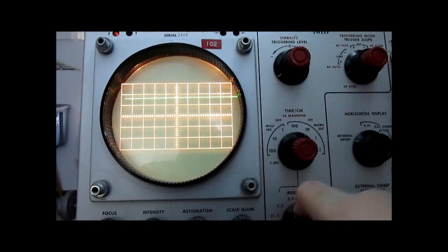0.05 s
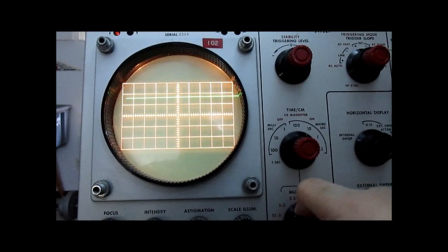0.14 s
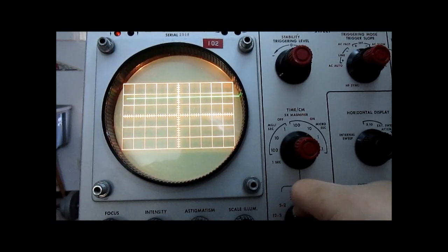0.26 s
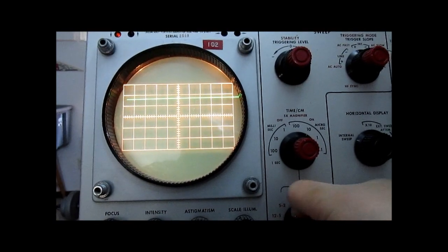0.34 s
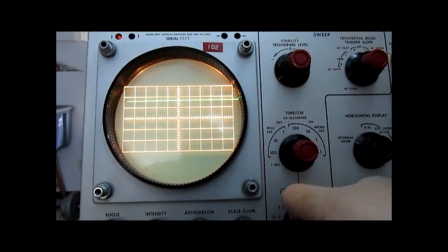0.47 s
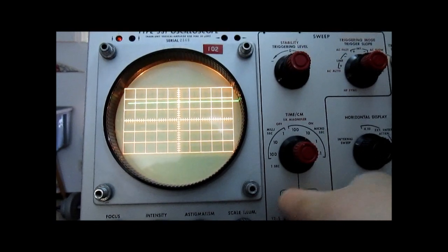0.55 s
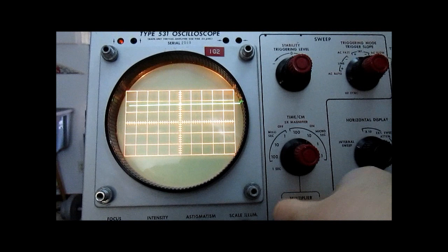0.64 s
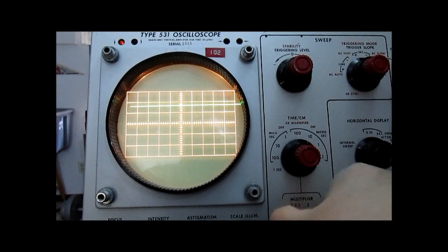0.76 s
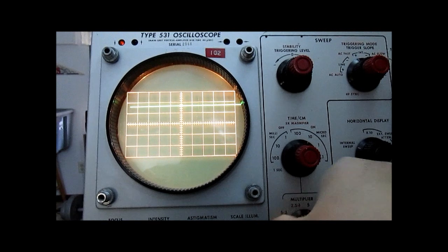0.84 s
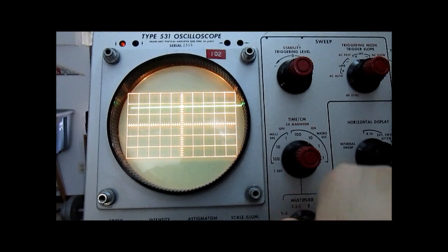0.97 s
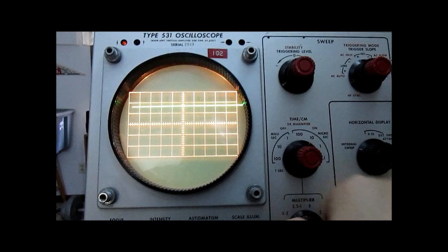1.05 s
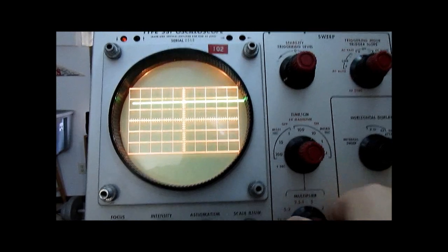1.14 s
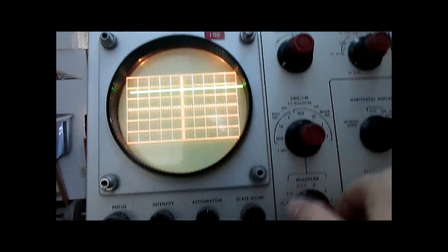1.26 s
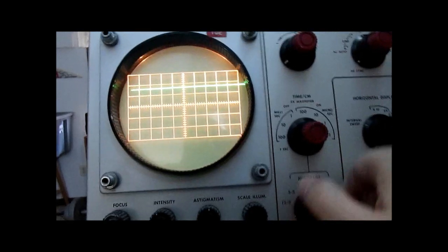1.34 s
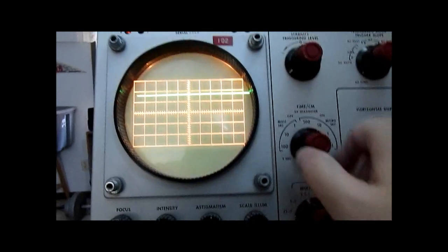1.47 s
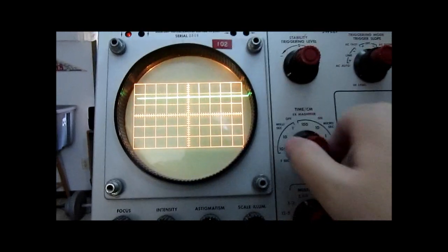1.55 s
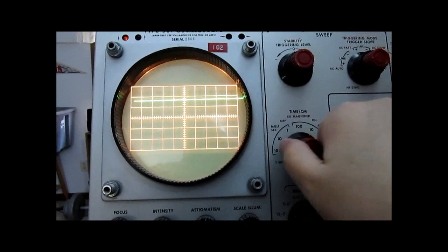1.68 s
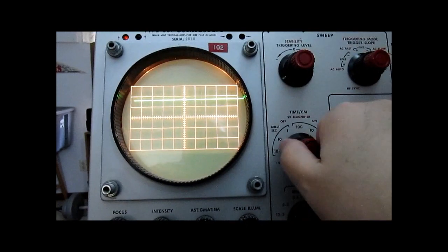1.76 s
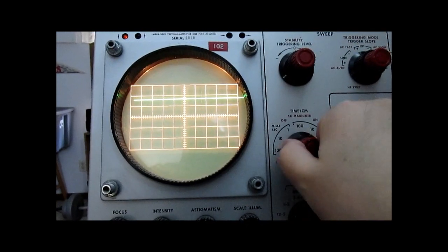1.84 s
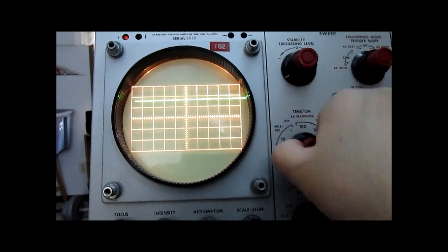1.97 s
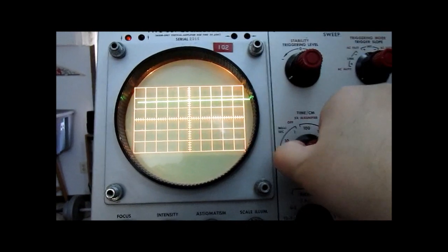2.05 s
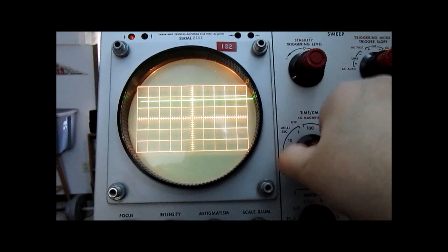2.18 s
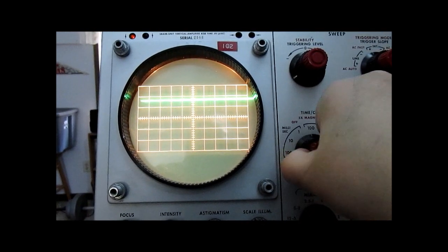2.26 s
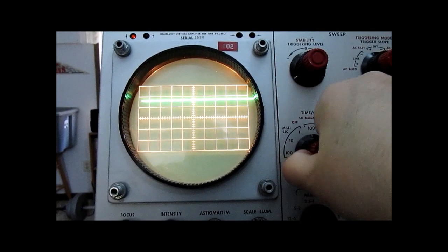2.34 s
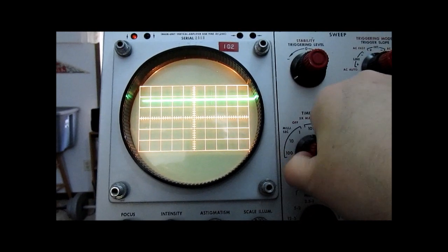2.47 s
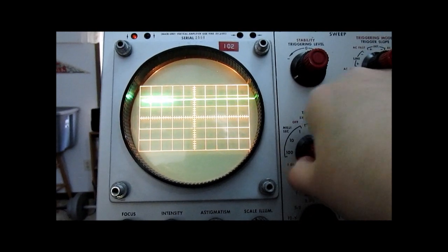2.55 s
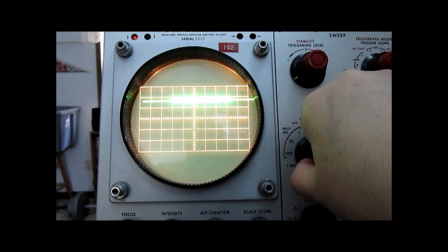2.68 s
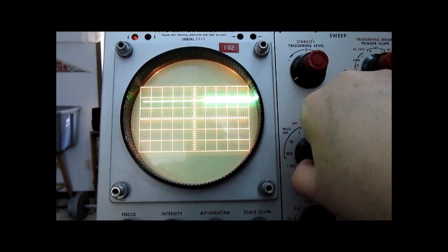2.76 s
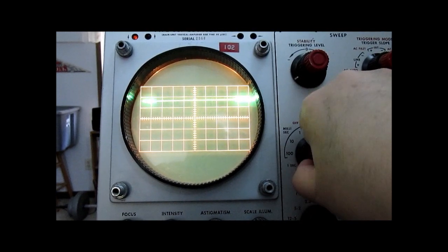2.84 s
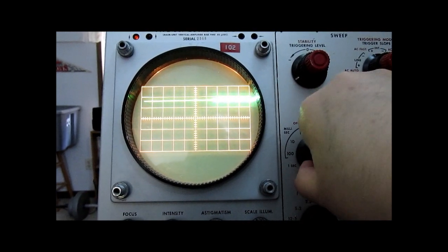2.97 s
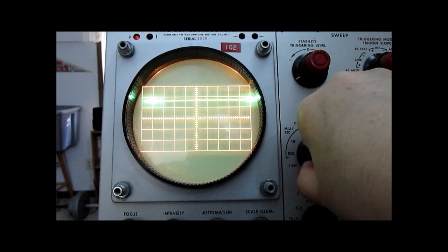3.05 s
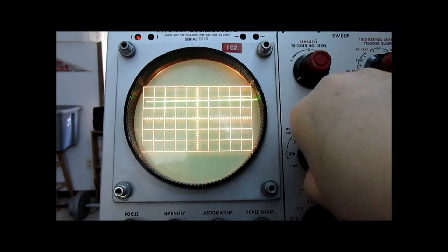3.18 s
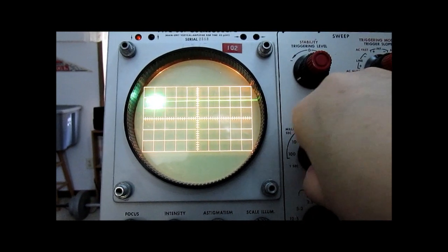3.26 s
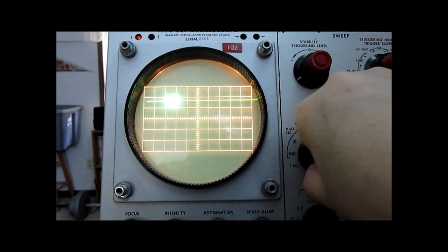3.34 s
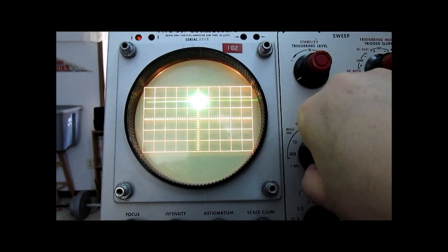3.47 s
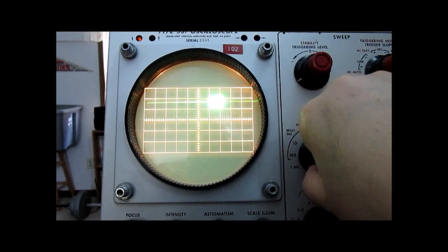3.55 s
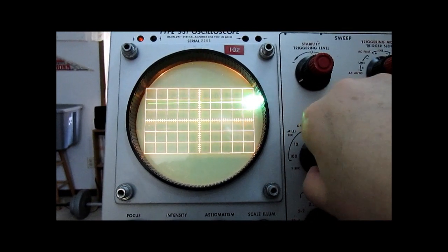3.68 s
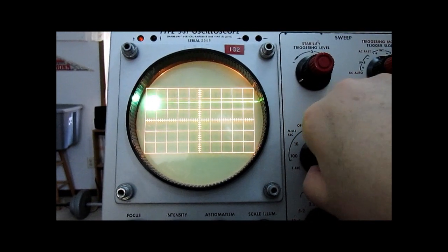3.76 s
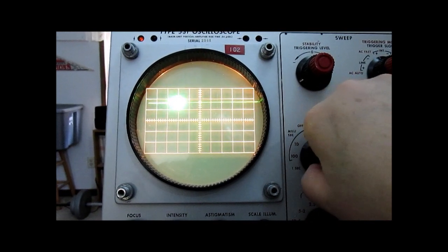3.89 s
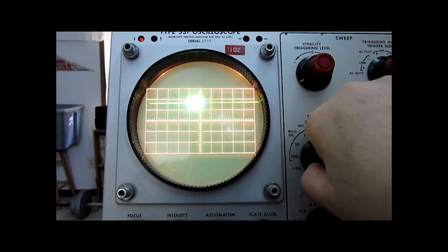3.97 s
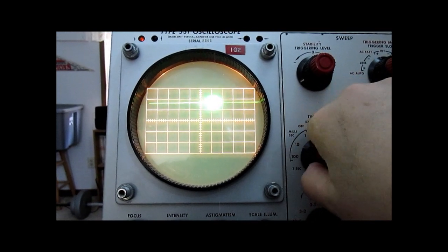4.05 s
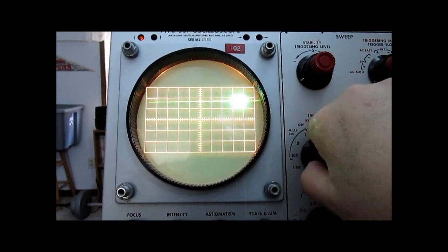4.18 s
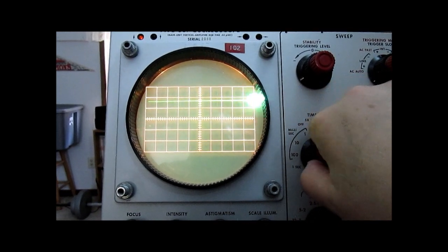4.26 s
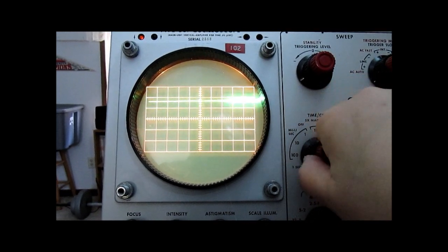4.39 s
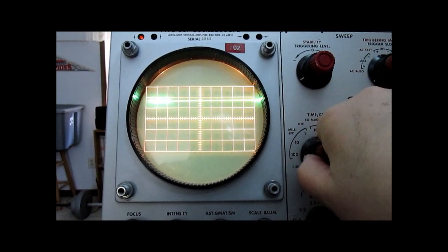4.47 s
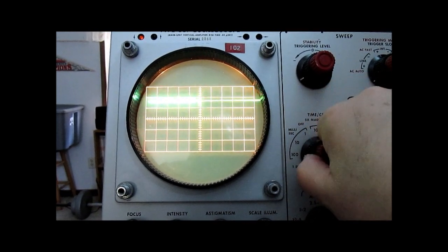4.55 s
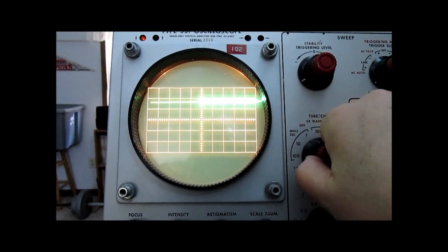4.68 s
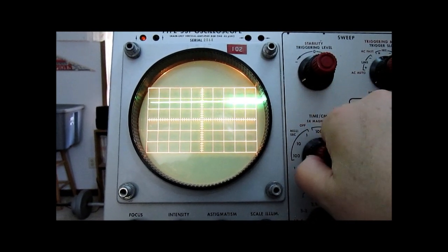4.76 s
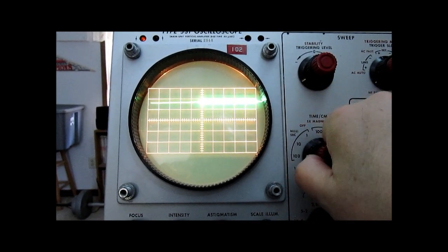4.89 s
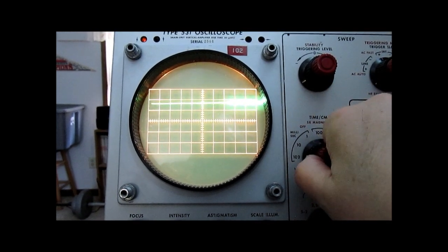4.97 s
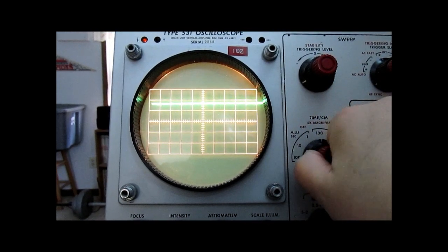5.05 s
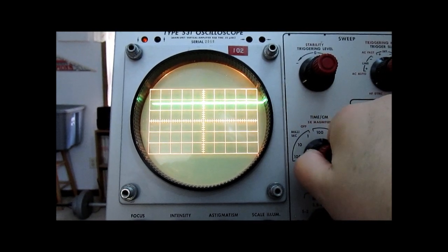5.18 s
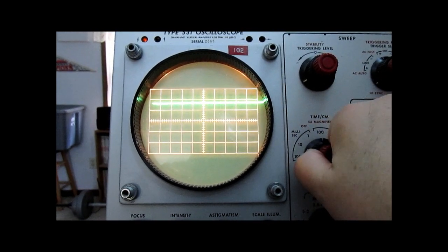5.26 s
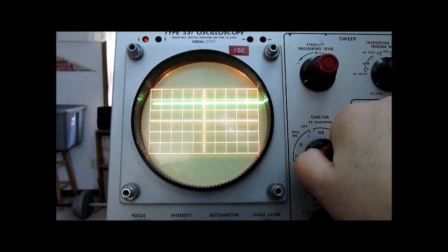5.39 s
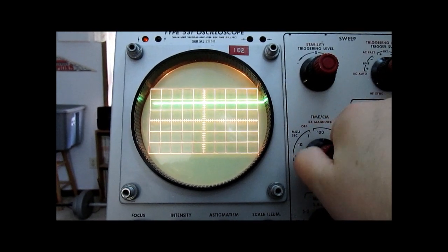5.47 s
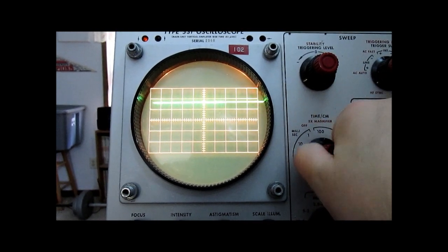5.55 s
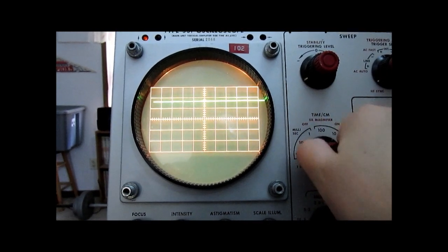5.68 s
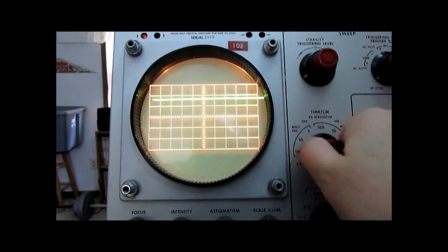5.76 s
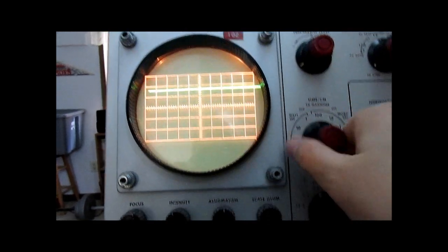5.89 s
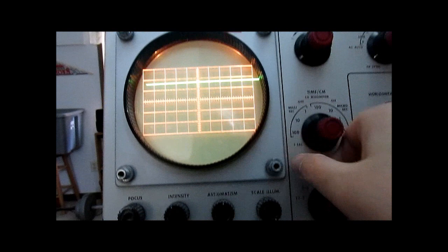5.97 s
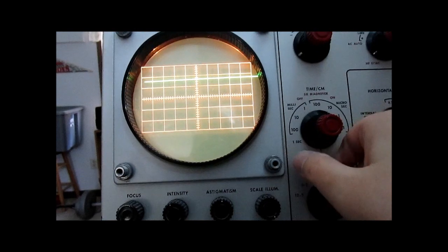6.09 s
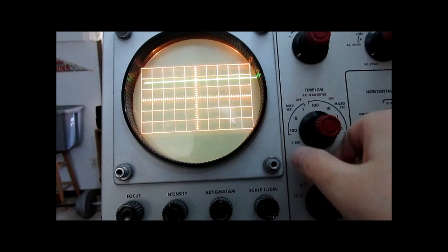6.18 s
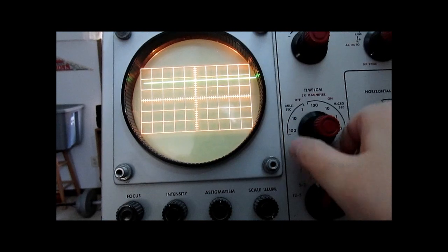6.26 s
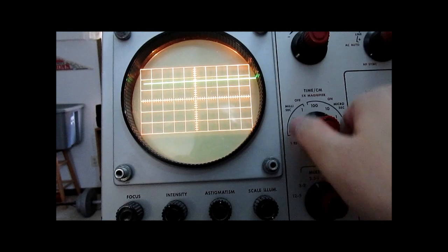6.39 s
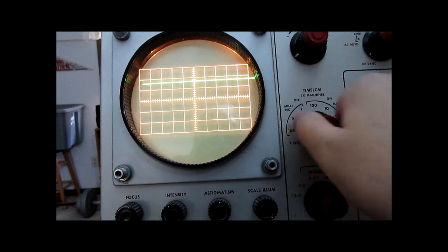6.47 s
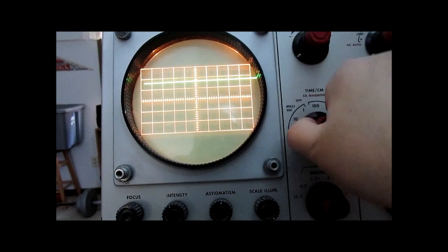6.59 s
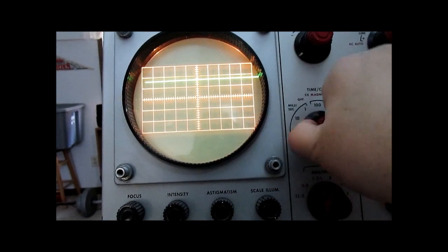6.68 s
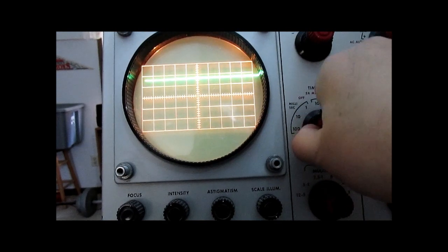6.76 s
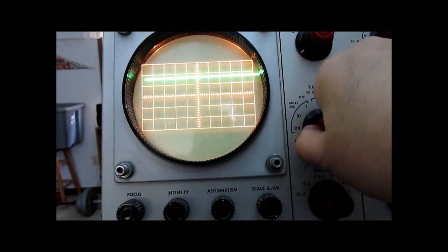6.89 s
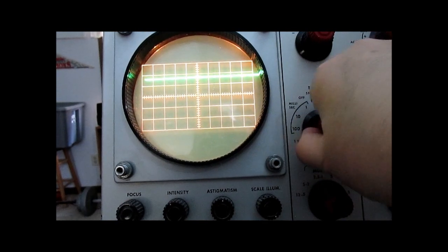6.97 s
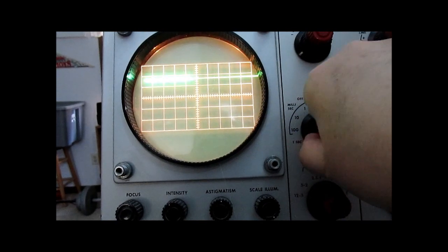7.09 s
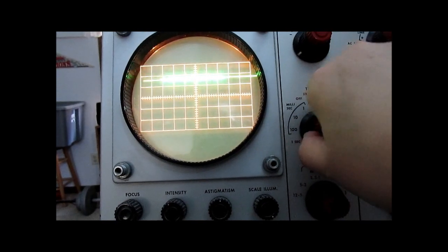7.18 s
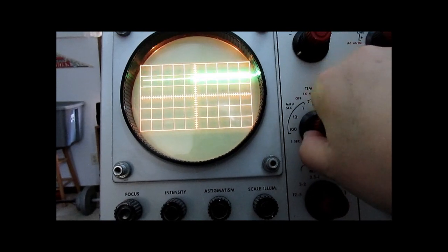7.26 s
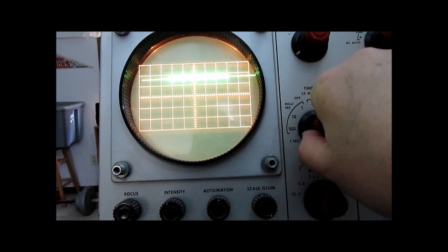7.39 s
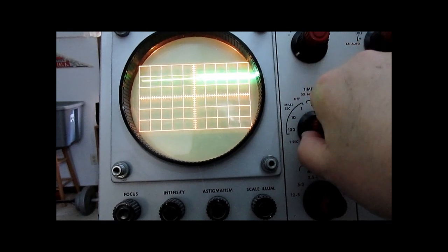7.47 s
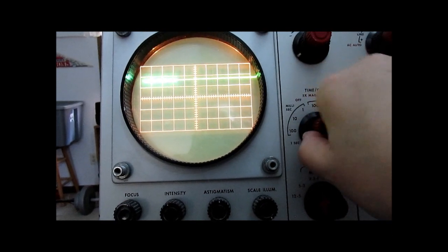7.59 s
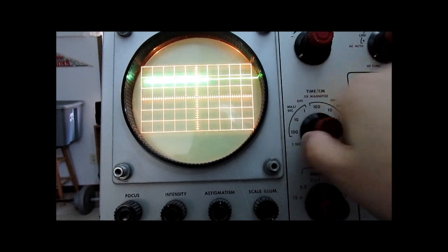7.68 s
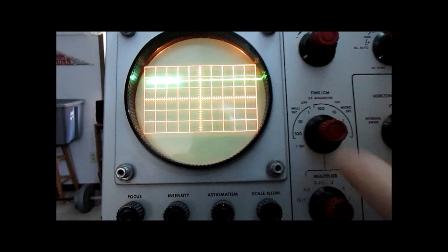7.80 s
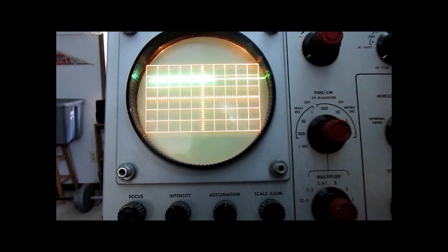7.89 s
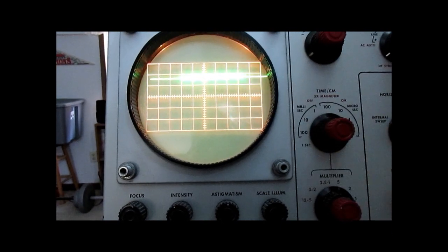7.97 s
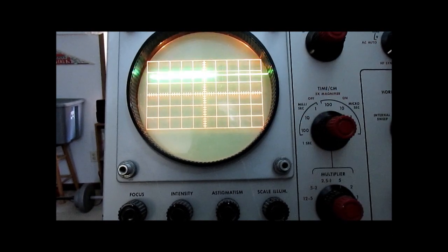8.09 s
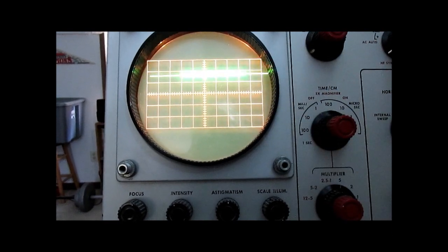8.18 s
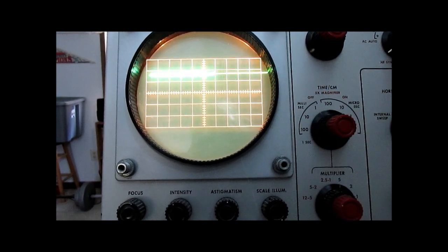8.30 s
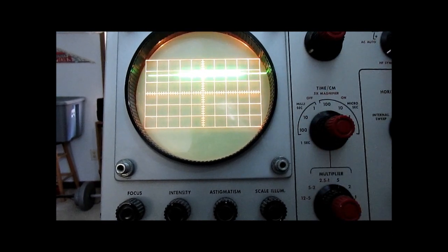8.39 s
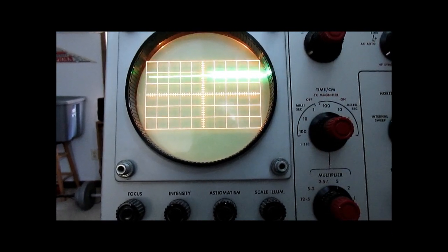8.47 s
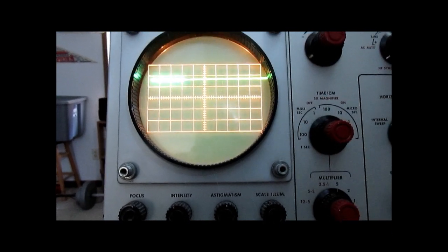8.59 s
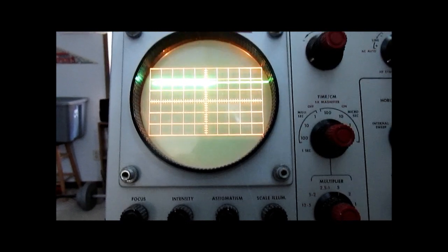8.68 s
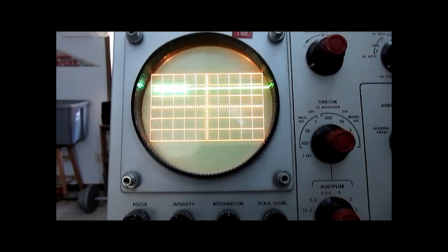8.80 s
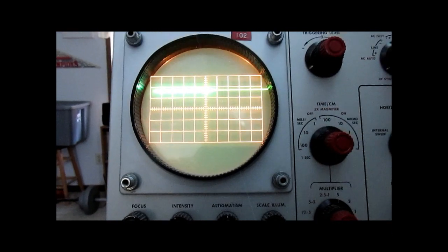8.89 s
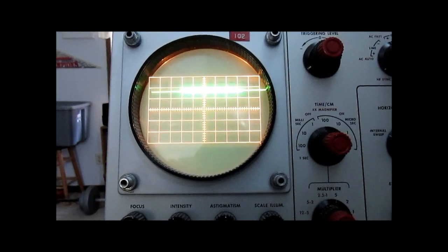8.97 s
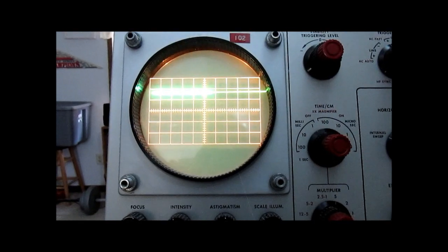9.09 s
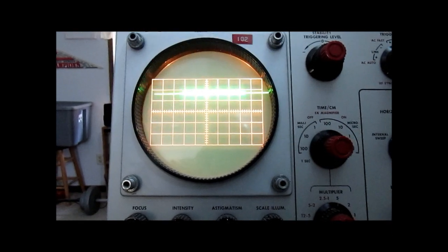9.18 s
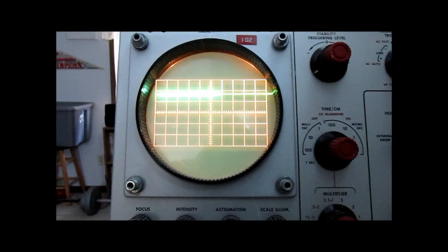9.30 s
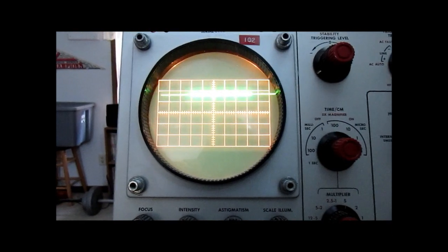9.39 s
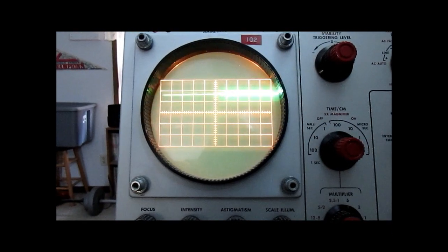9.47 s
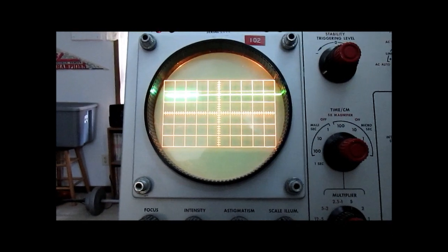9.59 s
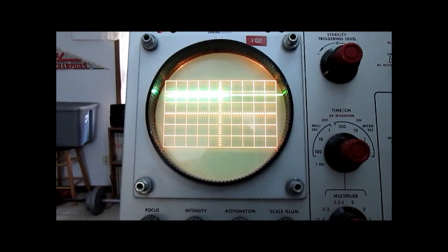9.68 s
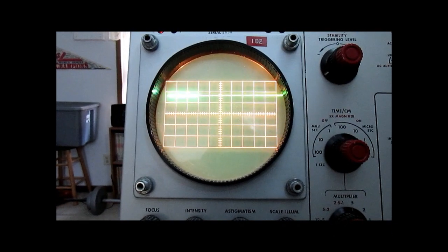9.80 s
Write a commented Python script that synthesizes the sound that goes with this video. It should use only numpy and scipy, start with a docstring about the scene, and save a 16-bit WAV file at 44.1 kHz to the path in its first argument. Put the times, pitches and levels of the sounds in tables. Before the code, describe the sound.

The cooling fan of an old oscilloscope hums steadily with a low rush of air. Over it, a hand turns rotary switches, which snap through their detents in about a dozen sharp, metallic clicks, unevenly spaced and often doubled. The clicking stops after about seven seconds, leaving the fan and a few faint ticks. The sound is close, in a small room.

```python
"""A hand turns the rotary switches of an old valve instrument. Each detent snaps, often in two or three
contacts a few milliseconds apart, among faint taps and ticks; each impact excites damped modes of spring,
panel and wafers, and a small room reverberates. Behind them the cooling fan hums and drives turbulence
through the resonances of the metal cabinet, and the hand rustles. Two close microphones receive it."""
import sys
import numpy as np
from scipy import signal
from scipy.fft import rfft, irfft, next_fast_len
from scipy.io import wavfile
from scipy.ndimage import uniform_filter1d, map_coordinates

SR = 44100
rng = np.random.default_rng(int(sys.argv[2]) if len(sys.argv) > 2 else 0)


def transcribe(signal):
    """Save signal, clipped to [-1, 1], as a 16-bit WAV file at the path in sys.argv[1]."""
    frames = np.atleast_2d(signal).T
    limited = np.clip(frames, -1, 1)
    pcm = np.round(limited * 32767).astype(np.int16)
    wavfile.write(sys.argv[1], SR, pcm)


N = 433944


def amp(db):
    """Amplitude ratio of a level in decibels."""
    return 10 ** (np.asarray(db) / 20)


def unit_rms(x):
    """Normalisation to a root mean square of 1."""
    return x / np.sqrt(np.mean(x ** 2) + 1e-20)


def curve_at(points, hz):
    """Interpolation of (frequency_hz, value) points on a logarithmic frequency axis."""
    frequencies, values = np.transpose(points)
    return np.interp(np.log(hz + 1), np.log(frequencies + 1), values)


def filtered(x, response):
    """Linear filtering: the spectrum is multiplied by a complex frequency response."""
    n = x.shape[-1]
    size = next_fast_len(n + 8192)
    return irfft(rfft(x, size) * response(np.fft.rfftfreq(size, 1 / SR)), size)[..., :n]


def wobble(rate_hz):
    """Slow random modulation: a spline through rate_hz Gaussian values a second."""
    knots = rng.standard_normal(int(N * rate_hz / SR) + 4)
    return map_coordinates(knots, [np.arange(N) * rate_hz / SR])


# Spectrum of the turbulent air: frequency_hz, relative_density_db
TURBULENCE = [(12, -60), (20, -26), (59, -18.5), (119, -11.5), (144, -15.5), (219, -3), (266, -8.5),
              (306, -11.5), (439, -17), (614, -18), (767, -23), (1200, -24.5), (1670, -32), (1920, -35),
              (15500, -60)]
# Peaks and dips from cabinet, room and microphone: centre_hz, width_hz, gain_db
RESONANCES = [(25, 6, 3), (35, 6, -6), (131.8, 17, 7.5), (141.8, 9.1, -7), (169, 16.2, 6.5), (215, 25, 3),
              (235.4, 6.1, 3.5), (288, 7.2, -9.5), (290, 9.6, 1), (349.5, 19.5, 3), (382.8, 6.2, 5),
              (428, 10, -4.5), (471, 18, 4), (552.4, 26, 3.5), (628.4, 20.4, 5.5), (827, 20, 7),
              (1041, 35, 5.5), (1228, 10.4, 7.5), (1486, 39, 5), (1644, 32, 7), (1770, 57, 3),
              (2212, 17, 7.5), (4370, 540, -3), (6240, 1300, 2), (10400, 1600, -4.5), (13500, 2700, 1.5)]
# Likeness of the fan noise at the two microphones: frequency_hz, coherence
FAN_COHERENCE = [(60, 0.68), (100, 0.93), (180, 1), (310, 0.92), (550, 0.85), (950, 0.81), (1650, 0.69),
                 (2860, 0.23), (4970, 0.23), (8640, 0.081), (15000, 0.02)]
# Level difference between the microphones: frequency_hz, left_minus_right_db
FAN_BALANCE = [(40, -2), (65, 3.5), (99, -4.5), (160, 2.5), (270, -2.5), (450, -2.5), (740, 1), (1220, -1),
               (2010, -2), (3330, -1.5), (5500, 0), (9080, 0.5), (15000, 0)]
FAN_DB, FAN_DRIFT_DB = -32, 0.07


def fan_noise():
    """Source and filter: resonances colour turbulence, coherent in the bass and diffuse in the treble."""
    def colour(hz):
        resonance_db = sum(db * np.exp(-.5 * ((hz - centre) / (width / 2)) ** 2)
                           for centre, width, db in RESONANCES)
        angle = np.arccos(np.clip(curve_at(FAN_COHERENCE, hz), -1, 1)) / 2  # divides mid from side
        return amp(curve_at(TURBULENCE, hz) + resonance_db) * [np.cos(angle), np.sin(angle)]

    def paths(hz):
        sign = np.array([[1], [-1]])
        delay = np.exp(-2j * np.pi * hz * 3e-5 * sign)  # the fan is nearer the right microphone
        return amp(curve_at(FAN_BALANCE, hz) / 2 * sign) * delay

    mid, side = filtered(rng.standard_normal((2, N)), colour)
    air = filtered(np.array([mid + side, mid - side]), paths)
    return amp(FAN_DB + FAN_DRIFT_DB * wobble(1.42)) * unit_rms(air)


# Blade and motor tones: pitch_hz, level_db, wander_hz
FAN_TONES = [(128, -51.5, 3.7), (210.7, -40, 9.24), (241.5, -46, 7.2)]


def fan_hum():
    """Rotation radiates tones, randomly modulated in level and pitch and alike at both microphones."""
    hum = np.zeros(N)
    for pitch_hz, level_db, wander_hz in FAN_TONES:
        amplitude = np.sqrt(2) * amp(level_db + 1.5 * wobble(6))
        phase = 2 * np.pi * np.cumsum(pitch_hz + wander_hz * wobble(25)) / SR
        hum += amplitude * np.sin(phase)
    return hum


# Rubs of skin or sleeve: centre_s, half_length_s, level_db
HAND_RUBS = [(7.757, .02, -62), (8.51, .05, -63), (8.88, .03, -69)]


def hand_rustle():
    """Friction noise: the moving hand makes faint, fluttering swells of treble hiss."""
    t = np.arange(N) / SR
    swell = sum(amp(db) * np.exp(-((t - centre_s) / half_s) ** 4) for centre_s, half_s, db in HAND_RUBS)
    spectrum = [(3000, -22.5), (6500, 7.0), (15000, -7.0)]  # frequency_hz, gain_db
    hiss = filtered(rng.standard_normal((2, N)), lambda hz: amp(curve_at(spectrum, hz)))
    return swell * amp(1.5 * wobble(55)) * unit_rms(hiss)


# Reverberation time of the room: frequency_hz, t60_s
ROOM_DECAY = [(1000, 0.2), (3500, 0.2), (7000, 0.21), (12000, 0.2), (15500, 0.11)]
# Spectrum at the start of the reverberation: frequency_hz, relative_level_db
ROOM_SPECTRUM = [(600, -10.5), (1200, 1), (2400, -1), (3300, -3.5), (5000, -3.5), (7000, -5.5), (8500, -2),
                 (15500, -3)]


def reverberation(dry):
    """Convolution with a diffuse field, decaying exponentially in each band, and one discrete echo."""
    hz, t, noise = signal.stft(rng.standard_normal((2, SR // 3)), SR, nperseg=128)
    decay = amp(curve_at(ROOM_SPECTRUM, hz)[:, None] - 60 * t / curve_at(ROOM_DECAY, hz)[:, None])
    tail = signal.istft(noise * decay, SR, nperseg=128)[1]
    tail = amp(-12.5) * tail / np.linalg.norm(tail[0])
    response = np.pad(tail, ((0, 0), (round(.006 * SR), 0)))  # the first reflections take 6 ms
    response[:, round(.0352 * SR)] += amp(-36)  # echo from a far wall
    return signal.fftconvolve(dry, response, axes=1)


def ring(modes, age_s, spread_rad, scrape_db, centre_hz=None, log_width=.1):
    """Modal superposition: damped sines roughened by scraping metal, scaled to rms 1 near the peak."""
    hz, db, t60_s = np.transpose(modes)[:, :, None, None]
    if centre_hz:  # the contact favours modes near this frequency
        db = db - 6 * np.minimum((np.log(hz / centre_hz) / log_width) ** 2, 2.2)
    shared_phase, phase_offset, scatter_db, detune = rng.standard_normal((4, len(modes), 2, 1))
    hz = hz * (1 + .008 * detune[:, :1])  # each contact rings at slightly different, random pitches
    # Each mode radiates differently to each microphone.
    phase = 2 * np.pi * shared_phase[:, :1] + spread_rad * phase_offset
    scrape = uniform_filter1d(rng.standard_normal((len(modes), 2, len(age_s))), size=22, axis=2)
    roughness = 1 + amp(scrape_db) * unit_rms(scrape)
    decay_s = np.maximum(age_s, 0)
    attack = np.clip(1 - age_s / age_s[0], 0, 1) ** 2
    impact = 1 + 0.79 * amp(-60 * decay_s / 0.011)  # the blow stands above the ringing
    amplitude = amp(db + scatter_db - 60 * decay_s / t60_s) * roughness
    sound = np.sum(amplitude * np.sin(2 * np.pi * hz * age_s + phase), axis=0) * attack * impact
    near_peak = (age_s > -.0005) & (age_s < .0015)
    return sound / np.sqrt(np.mean(sound[:, near_peak] ** 2))


# Modes of the panel, spring, snap, wafers and top sizzle: pitch_hz, relative_level_db, t60_s
PANEL_MODES = [(965, 8.5, 0.01), (1314, 0.5, 0.051), (1668, -1, 0.038), (1796, 0.5, 0.057),
               (2000, 2, 0.015), (2240, -9, 0.066)]
SPRING_MODES = [(2400, -12, 0.0071), (2710, 4.5, 0.014), (2900, 0, 0.028), (3153, 0, 0.038),
                (3446, 1, 0.02), (3730, 1.5, 0.028), (3900, -20, 0.02), (4360, 3, 0.011),
                (4500, 7.5, 0.018), (4800, 0, 0.012)]
SNAP_MODES = [(5300, 7, 0.018), (5640, 8, 0.055), (5690, -3, 0.037), (6160, -2.5, 0.019), (6490, 2, 0.034),
              (6770, 2.5, 0.019), (7400, -0.5, 0.034)]
WAFER_MODES = [(8220, 1.5, 0.021), (9200, -4, 0.013), (9900, -5.5, 0.017), (11050, -6.5, 0.043)]
SIZZLE_MODES = [(12700, 6, 0.027), (13300, -22, 0.0098), (13550, -4, 0.016), (14300, 10, 0.016)]


def contact(level_db, panel_db, spring_db, spring_hz, bright_db, snap_hz, rise_s):
    """Impact excitation: one contact rings all parts at once, heard directly and by reflection."""
    age_s = np.arange(round(.05 * SR)) / SR - np.clip(rise_s, .0001, .008)  # zero at the end of the rise
    snap = ring(SNAP_MODES, age_s, spread_rad=1.56, scrape_db=3.5, centre_hz=snap_hz)
    panel = ring(PANEL_MODES, age_s, spread_rad=.4, scrape_db=-10)
    spring = ring(SPRING_MODES, age_s, spread_rad=.96, scrape_db=-7.5, centre_hz=spring_hz, log_width=.089)
    wafers = ring(WAFER_MODES, age_s, spread_rad=1.4, scrape_db=-.5)
    sizzle = ring(SIZZLE_MODES, age_s, spread_rad=2.2, scrape_db=3) * amp([[1.8], [-1.8]])  # leans left
    treble = amp(-11 + bright_db) * wafers + amp(-12 + 1.3 * bright_db) * sizzle
    dry = amp(level_db) * (snap + amp(panel_db) * panel + amp(spring_db) * spring + treble)
    reflected = reverberation(dry * amp(3 - 60 * np.abs(age_s) / .018))  # mostly the impact feeds the room
    pan_db = -2.5 - .12 * panel_db  # left minus right; the panel radiates more to the right
    direct = dry * amp([[pan_db / 2], [-pan_db / 2]])
    return reflected + np.pad(direct, ((0, 0), (0, reflected.shape[1] - len(age_s))))


# Sharp clicks: loud detent snaps, plus a few faint finger taps and thin high ticks:
# start_s, level_db, relative_panel_db, relative_spring_db, spring_centre_hz, brightness_db
SHARP_CLICKS = [(0.6456, -24.5, -34, -9.5, 3900, 1), (0.9057, -22, -32, -13, 3930, -2),
                (0.91, -24.5, -14, -2, 3950, 3), (1.8772, -43, -3, 1, 2880, -5),
                (1.8815, -45, -5, -1, 4400, -5), (2.2783, -21, -14, 0, 3560, 4.5),
                (2.2832, -20, -8, -3.5, 3490, 2), (2.5935, -33, -26, -14, 3080, -13),
                (2.6211, -26, -20, -2, 3600, -6), (2.626, -26, -3.5, 1, 3630, 2),
                (3.215, -22, -20, -3.5, 3680, -0.5), (3.218, -23, -5.5, 0.5, 3130, 2),
                (4.4085, -28, -10, -4, 3180, -3), (4.4172, -20, -12, 1.5, 3850, 2),
                (4.4201, -20.5, -6.5, -8, 3820, -4), (5.0857, -33, -6, -6, 3700, -7),
                (5.1003, -37, -3, -4, 4160, -3), (5.1047, -27.5, -8, -5.5, 3230, -5),
                (5.6561, -26.5, -6.5, -8, 3100, -15), (5.66, -29, -5, -6, 3600, -13),
                (6.509, -32, 3, 4, 3000, 1), (6.5128, -34.5, 2, -3, 3070, 4),
                (6.8209, -18.5, -17, -3.5, 3680, 3), (6.825, -31, 2.5, 5, 3400, -4),
                (7.0647, -32.5, -25, -10, 2850, -12), (7.117, -24.5, -5, 1, 3220, 1),
                (8.413, -56, -20, -9, 2870, 7), (8.864, -48.5, -25, -11, 3450, 10),
                (8.9012, -52, -25, -2, 4400, 11)]
# Soft contacts as the roller climbs to a detent or a finger meets the knob:
# start_s, level_db, relative_panel_db, rise_s
SOFT_CONTACTS = [(0.627, -46, -5, .0014), (0.64, -47, -10, .0007), (1.947, -56, -30, .001),
                 (2.003, -55, -30, .003), (2.2546, -46, -27, 0.0034), (2.268, -44, -10, .0015),
                 (3.1819, -52, -10, .0007), (3.206, -47, -29, 0.0012), (5.64, -39, -8, 0.0015),
                 (6.111, -54, -30, .002), (6.796, -42, -25, 0.0012), (7.112, -42, 0, 0.002)]


def rotary_switch():
    """Superposed transients: sharp clicks rise abruptly; soft contacts rise more slowly and sound dull."""
    events = [(start_s, contact(*strike, snap_hz=6690, rise_s=.000615))
              for start_s, *strike in SHARP_CLICKS]
    for start_s, level_db, panel_db, rise_s in SOFT_CONTACTS:
        sound = contact(level_db, panel_db, spring_db=2 + .25 * panel_db, spring_hz=3320,
                        bright_db=-6, snap_hz=6370, rise_s=rise_s)
        events.append((start_s, sound))
    track = np.zeros((2, N + SR))
    for start_s, sound in events:
        start = round(start_s * SR)
        track[:, start:start + sound.shape[1]] += sound
    return track[:, :N]


def scene():
    """Linear superposition: the sound pressures of fan, switch and hand add."""
    return fan_noise() + fan_hum() + rotary_switch() + hand_rustle()


def record(dry):
    """Frequency response of the microphones: a narrow notch and a steep upper band limit."""
    notch_hz, width_hz, depth, top_hz = 7860, 180, 0.41, 15800

    def response(hz):
        notch = 1 - depth * 1j * hz * width_hz / (notch_hz ** 2 - hz ** 2 + 1j * hz * width_hz)
        return notch * np.clip((top_hz - hz) / 120, 0, 1) ** 2

    return filtered(dry, response)


dry = scene()
out = record(dry)
transcribe(out)
```